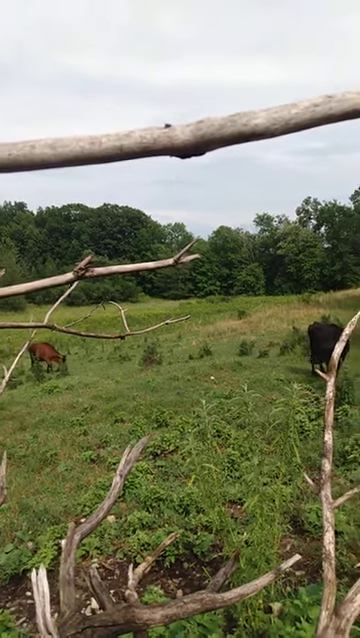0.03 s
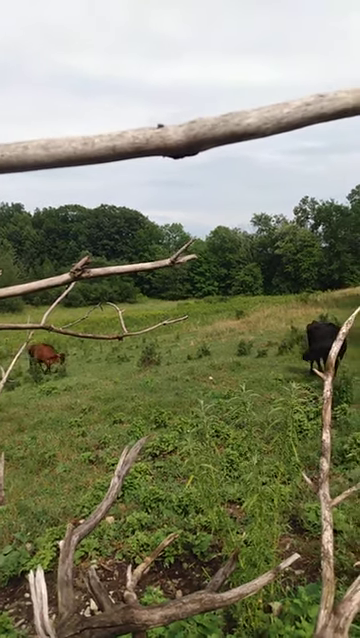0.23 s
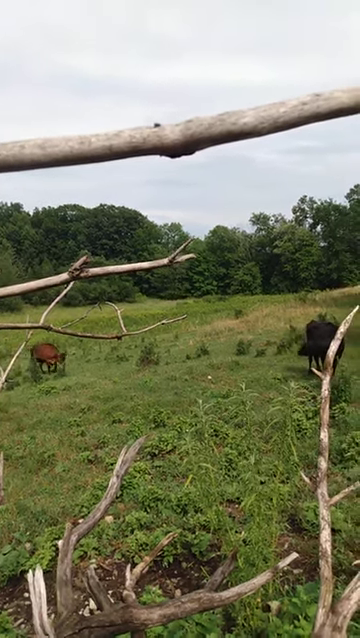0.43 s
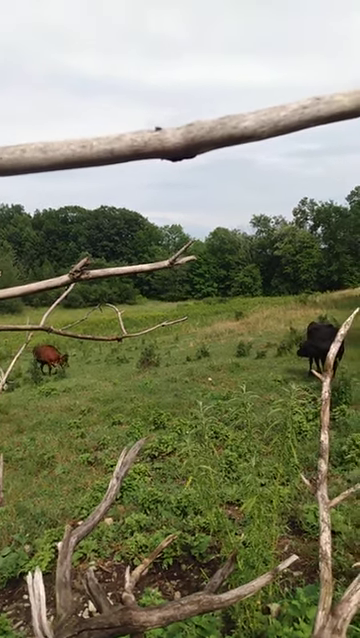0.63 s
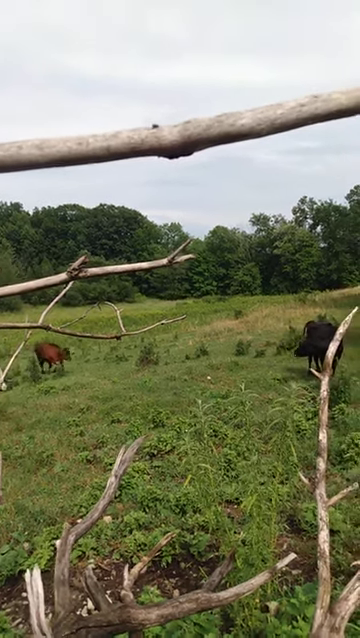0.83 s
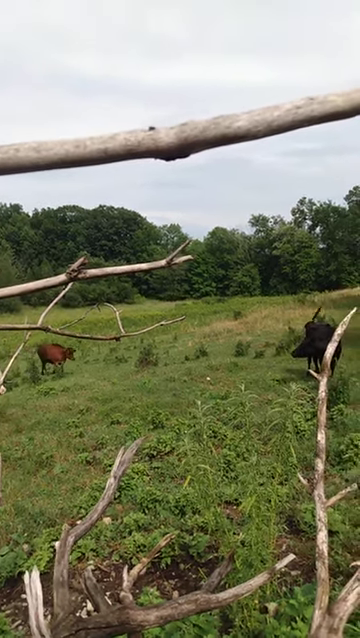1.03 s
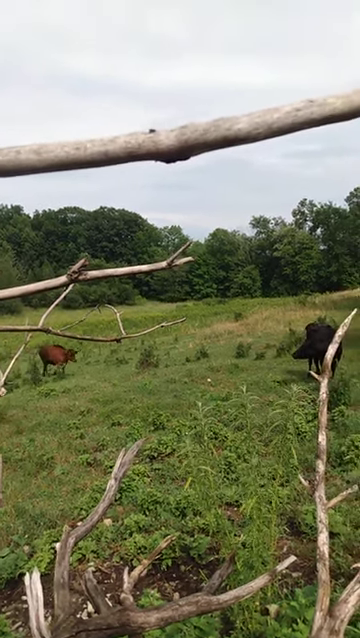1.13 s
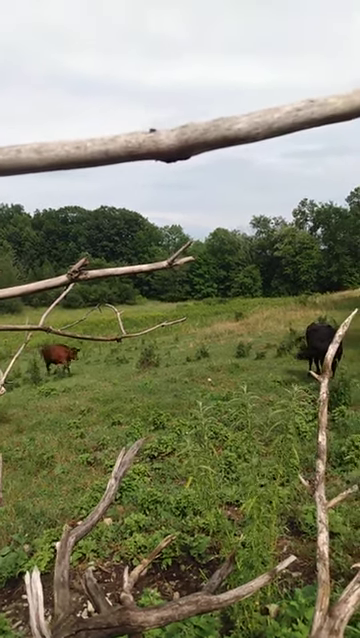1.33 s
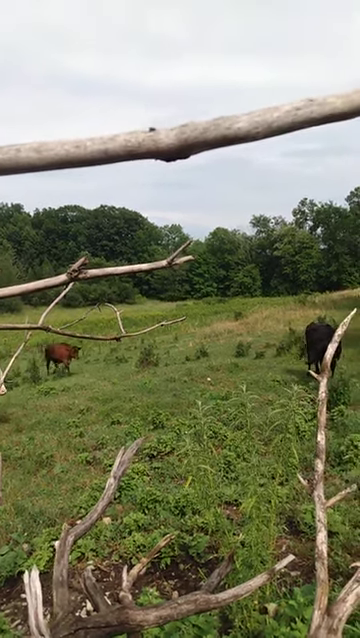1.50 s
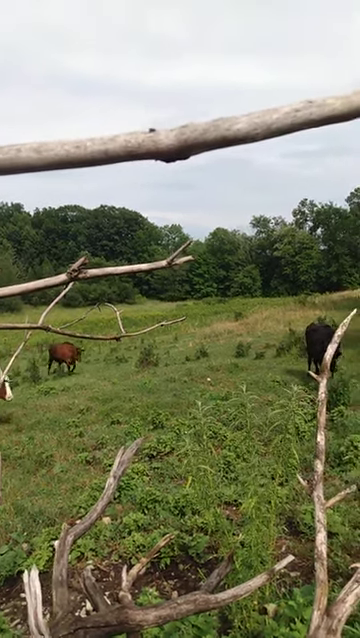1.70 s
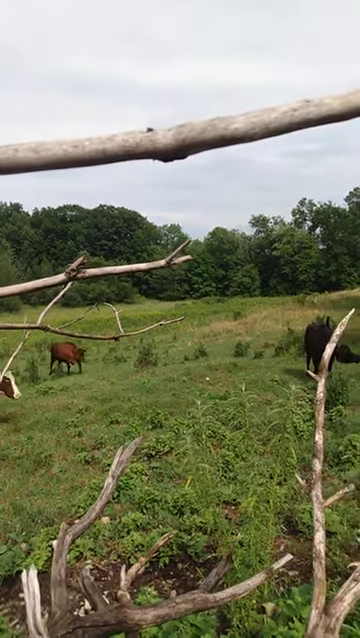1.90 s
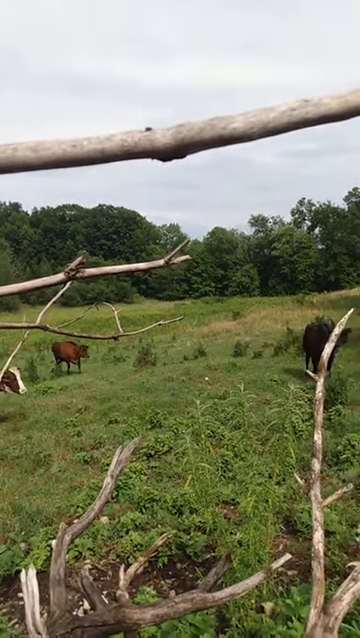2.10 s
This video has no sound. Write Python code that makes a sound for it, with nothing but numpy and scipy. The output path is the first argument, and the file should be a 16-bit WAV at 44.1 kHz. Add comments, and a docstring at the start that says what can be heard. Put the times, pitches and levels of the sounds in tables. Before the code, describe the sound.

Wind buffets the microphone with low rumbling thumps, strongest on the right around 0.2 seconds, fading by 0.5. Weaker puffs return near 1.4 and 2 seconds over a far rumble and soft hiss. Faint birds whistle short, mostly falling notes, mainly in the first 1.3 seconds. High, faint cricket chirps repeat about every 0.4 seconds, with a thin insect chorus and slight grass rustling in the quiet pasture.

```python
"""A quiet summer pasture. A puff of wind buffets the two microphone ports with turbulent pressure,
then sinks to faint eddies over a far rumble and a soft hiss. The grass rustles now and then,
a thin insect chorus merges into one band of noise, and small birds whistle from the echoing
tree line. Two crickets chirp, each at its own pace, by stridulation: quick runs of wing strokes."""
import sys
import numpy as np
from scipy import signal
from scipy.fft import rfft, irfft
from scipy.io import wavfile
from scipy.ndimage import uniform_filter1d

SR = 44100
rng = np.random.default_rng(int(sys.argv[2]) if len(sys.argv) > 2 else 0)


def materialize(psi):
    """Save the field psi as 16-bit PCM at rate SR to the path in sys.argv[1].

    A 1-D psi becomes a single channel; in a 2-D psi each row is a channel.
    """
    bounded = np.clip(np.atleast_2d(psi).T, -1, 1)
    quanta = np.round(bounded * 32767).astype(np.int16)
    wavfile.write(sys.argv[1], SR, quanta)


N = 94815
T = np.arange(N) / SR
FREQS = np.maximum(np.fft.rfftfreq(N, 1 / SR), 1)


def from_db(db):
    """Amplitude grows tenfold every 20 dB."""
    return 10 ** (np.asarray(db) / 20)


def unit_rms(x):
    """Normalisation to unit mean power."""
    return x / np.sqrt(np.mean(x ** 2) + 1e-20)


def envelope(rows):
    """Gain over time, interpolated in decibels."""
    return from_db(np.interp(T, *np.transpose(rows)))


def spectrum(rows):
    """Gain over frequency, interpolated on log-log axes."""
    hz, db = np.transpose(rows)
    return from_db(np.interp(np.log(FREQS), np.log(hz), db))


def noise(shape, correlation=0):
    """Filtered stereo noise of rms 1; the mid-side balance sets the left-right correlation."""
    mid, side = irfft(rfft(rng.standard_normal((2, N))) * shape, N)
    return unit_rms(np.sqrt(1 + correlation) * mid + np.sqrt(1 - correlation) * side * [[1], [-1]])


def wobble(corner_hz):
    """Random modulation: low-passed noise of spread 1."""
    return noise(1 / (1 + (FREQS / corner_hz) ** 2))[0]


def pan(db):
    """Interaural level difference, left minus right; the nearer side keeps full level."""
    return from_db([[min(db, 0)], [min(-db, 0)]])


# Wind at each port. Each row: time in seconds, level in dB.
GUST_LEFT = [(0, -39.5), (.03, -57.5), (.18, -54), (.28, -45), (.36, -55), (.41, -53.5), (.45, -66.5),
             (.66, -69), (.76, -73), (1.0, -65.5), (1.3, -86), (1.44, -63), (1.53, -74), (1.8, -75),
             (1.9, -64.5), (2.15, -71)]
GUST_RIGHT = [(0, -46), (.04, -49.5), (.1, -37.5), (.14, -40.5), (.2, -30), (.26, -32.5), (.305, -52.5),
              (.35, -40), (.41, -44.5), (.445, -55.5), (.495, -51.5), (.55, -66), (.66, -56), (.71, -62),
              (.77, -95), (.95, -72), (1.05, -62), (1.18, -68), (1.34, -69), (1.375, -51), (1.47, -55.5),
              (1.6, -66.5), (1.75, -72.5), (1.98, -64), (2.04, -56), (2.09, -65.5)]
# Large and fine eddies. Each row: frequency in Hz, relative spectral density in dB.
EDDY_SPECTRUM = [(20, 0), (42, 6), (75, -2.5), (110, -5.5), (160, -10), (220, -21.5), (310, -34.5),
                 (450, -43.5), (900, -66), (3000, -88)]
FINE_EDDY_SPECTRUM = [(90, 0), (180, 3), (290, -2.5), (420, -16), (800, -45), (2000, -70)]

def wind(fine_top_db=-47, fine_exponent=1.53):
    """Turbulence, independent at each port; fine eddies grow as a power of the gust and brighten it."""
    eddies = noise(spectrum(EDDY_SPECTRUM))
    local_rms = np.sqrt(uniform_filter1d(eddies ** 2, size=1800, axis=1))
    gust = np.array([envelope(GUST_LEFT), envelope(GUST_RIGHT)])
    fine_gain = from_db(fine_top_db) * (gust / gust.max()) ** fine_exponent
    return gust * eddies / local_rms + fine_gain * noise(spectrum(FINE_EDDY_SPECTRUM))


# Far rumble and soft hiss. Each row: time in seconds, level in dB.
RUMBLE_LEVEL = [(0, -63), (.5, -67), (.75, -70.5), (.92, -67.5), (1.25, -70.5), (1.7, -70), (2.15, -70.5)]
HISS_LEVEL = [(0, -69), (.24, -68), (.41, -68), (.44, -73.5), (.75, -75), (1.1, -74.5), (1.45, -73.5),
              (1.8, -74), (2.15, -74)]
# Their spectra. Each row: frequency in Hz, relative spectral density in dB.
RUMBLE_SPECTRUM = [(20, -12), (55, -1), (100, 2), (125, -1.5), (165, -1), (212, -10), (255, -2),
                   (340, -12.5), (550, -17.5), (1000, -28.5), (2500, -39), (8000, -65)]
HISS_SPECTRUM = [(100, -11), (600, 5.5), (1300, 2), (2500, 0), (4000, -2.5), (5200, -1), (6400, -8),
                 (7800, -6), (9800, -3.5), (11500, 0.5), (13500, -1.5), (15600, -2.5)]
# Lean of the hiss. Each row: frequency in Hz, left minus right in dB.
HISS_BALANCE = [(700, 3), (1300, -2.5), (2400, -2.5), (4400, -1.5), (7500, 0), (15000, 1.5)]

def air():
    """Interaural correlation sets width: high for the centred rumble, low for the wide hiss."""
    lean = np.sqrt(spectrum(HISS_BALANCE))
    hiss = noise(spectrum(HISS_SPECTRUM), correlation=.12)
    hiss = irfft(rfft(hiss) * [lean, 1 / lean], N)
    rumble = noise(spectrum(RUMBLE_SPECTRUM), correlation=.93)
    return envelope(RUMBLE_LEVEL) * rumble + envelope(HISS_LEVEL) * hiss


# Rustling grass. Each row: time in seconds, level in dB.
RUSTLE_LEVEL = [(0, -84), (.25, -73), (.41, -86), (.47, -81), (.8, -93), (1.02, -81), (1.06, -78.5),
                (1.12, -80.5), (1.17, -83.5), (1.6, -88.5), (1.92, -87), (2.02, -74.5), (2.15, -77)]
# Its spectrum. Each row: frequency in Hz, relative spectral density in dB.
RUSTLE_SPECTRUM = [(200, -23), (600, 0), (1300, -1), (2500, -1.5), (4500, -9), (7000, -11), (15000, -18.5)]
# Soft ticks in the grass. Each row: start in seconds, level in dB, band centre in Hz.
GRASS_TICKS = [(1.607, -75, 1000), (1.686, -71.5, 1850)]

def grass(grain_db=3, tick_decay_s=.0091, tick_width_octaves=.3):
    """Random amplitude modulation makes the rustle grainy; ticks are damped bursts of band noise."""
    rustle = noise(spectrum(RUSTLE_SPECTRUM), correlation=.3)
    grain = from_db(grain_db * wobble(corner_hz=89.5))
    out = envelope(RUSTLE_LEVEL) * unit_rms(rustle * grain)
    for start, db, hz in GRASS_TICKS:
        age = np.maximum(T - start, 0) / tick_decay_s
        band = np.exp(-.5 * (np.log2(FREQS / hz) / tick_width_octaves) ** 2)
        out += from_db(db) * np.sqrt(age) * np.exp(-age) * noise(band, correlation=.3)
    return out


# Insect chorus. Each row: time in seconds, level in dB.
CHORUS_LEVEL = [(0, -76), (.38, -76.5), (.46, -81), (.51, -76), (.58, -82.5), (1.2, -82.5), (2.15, -82.5)]
# Its spectrum. Each row: frequency in Hz, relative spectral density in dB.
CHORUS_SPECTRUM = [(4700, -21), (5150, -14.5), (5420, -4), (5700, -2.5), (5850, -6.5), (6050, -32),
                   (6500, -66)]

def insect_chorus():
    """Incoherent summation: many far insects merge into one narrow band of noise."""
    return envelope(CHORUS_LEVEL) * noise(spectrum(CHORUS_SPECTRUM)) * pan(db=-4.5)


# Slurred notes. Each row: start and length in seconds, first pitch, last pitch and burr depth in Hz,
# peak level in dB, echo relative to the note in dB.
BIRD_NOTES = [(.008, 0.033, 3700, 2950, 240, -66.5, 3), (0.06, 0.049, 4760, 3230, 38, -67, -7),
              (0.191, 0.049, 3484, 3164, 134, -72, 6), (0.238, 0.026, 3590, 2580, 150, -65.5, -12),
              (.472, 0.054, 6260, 6200, 20, -78, -20), (0.551, 0.02, 4180, 4340, 260, -74, 1),
              (0.634, 0.053, 4200, 4960, 380, -72, 0.5), (0.682, 0.035, 3610, 2930, 150, -74, -8),
              (0.766, 0.035, 5050, 4020, 330, -71.5, 2), (0.83, 0.037, 3436, 2770, 150, -67, -1),
              (0.903, 0.051, 3440, 2944, 160, -67, -6), (1.212, .048, 3340, 2830, 170, -65, -1.5),
              (1.693, 0.027, 1800, 1830, 26, -77, 0), (2.089, 0.02, 1420, 1200, 130, -68, -6)]

def birds(burr_rate_hz=95.2, warble_depth_hz=49.8):
    """Frequency modulation: each echoing whistle glides, with a fast burr and a random warble."""
    out = np.zeros((2, N))
    warble = warble_depth_hz * wobble(corner_hz=128)
    for start, length, first_hz, last_hz, burr_depth_hz, db, echo_db in BIRD_NOTES:
        progress = np.clip((T - start) / length, 0, 1)
        burr = burr_depth_hz * np.sin(2 * np.pi * burr_rate_hz * (T - start))
        pitch = first_hz + (last_hz - first_hz) * progress + warble + burr
        note = from_db(db) * np.sin(np.pi * progress) * np.sin(2 * np.pi * np.cumsum(pitch) / SR)
        out += note + from_db(echo_db) * tree_echoes(note)
    return out * pan(db=-12)


def tree_echoes(note, t60_s=.25, delay_s=.0097):
    """Scattering from the tree line returns an exponentially decaying tail, different in each ear."""
    tail = rng.standard_normal((2, N)) * from_db(-60 * T / t60_s) * (T > delay_s)
    tail /= np.sqrt(np.sum(tail ** 2, axis=1, keepdims=True))
    return signal.fftconvolve(note[None], tail, axes=1)[:, :N]


# Single eddies. Each row: centre in seconds, level in dB, pitch in Hz, left minus right in dB.
EDDY_THUMPS = [(0.176, -18, 76, -39), (0.204, -28, 124, -25), (0.28, -33.5, 55, 21), (0.33, -35.5, 72, 18),
               (.352, -39.5, 153, -10), (0.488, -51.5, 65.4, -15), (1.044, -56.5, 60.4, 0),
               (1.422, -49, 62, -12), (1.68, -47, 67, 26), (2.051, -50, 49, -3)]

def eddy_thumps(width_cycles=.66, edge_gain=.25):
    """A bipolar pressure pulse: an eddy pushes and then pulls on a port."""
    def pulse(cycles):
        return -np.sin(2 * np.pi * cycles) * np.exp(-(cycles / width_cycles) ** 2)

    out = np.zeros((2, N))
    for centre, db, hz, pan_db in EDDY_THUMPS:
        cycles = (T - centre) * hz
        out += from_db(db) * pan(pan_db) * (pulse(cycles) + edge_gain * pulse(2 * cycles))
    return out


# Chirps of the near and the far cricket. Each row: centre in seconds, peak level in dB.
NEAR_CHIRPS = [(.186, -64), (.611, -71.5), (1.027, -71.5), (1.431, -69), (1.833, -69.5)]
FAR_CHIRPS = [(.258, -77), (.55, -91), (.835, -82.5), (1.16, -83), (1.432, -77.5), (1.695, -80),
              (2.13, -85)]

def cricket(chirps, hz, sag_hz, half_length_s, strokes_per_s, pan_db, stroke_fall_hz=120):
    """Stridulation: each wing stroke sounds a falling tone; level and pitch arch over the chirp."""
    out = np.zeros(N)
    for centre, db in chirps:
        offset = np.clip((T - centre) / half_length_s, -2, 2)
        stroke_phase = (T - centre) * strokes_per_s % 1
        pitch = hz - sag_hz * np.minimum(offset ** 2, 2) - stroke_fall_hz * (stroke_phase - .5)
        arch = np.exp(-np.abs(offset) ** 3) * (np.abs(offset) < 2)
        strokes = np.sin(np.pi * stroke_phase) ** 2
        out += from_db(db) * arch * strokes * np.sin(2 * np.pi * np.cumsum(pitch) / SR)
    return out * pan(pan_db)


def scene():
    """Superposition: the pressures of all sources add."""
    pasture = wind() + air() + grass() + insect_chorus() + birds() + eddy_thumps()
    near = cricket(NEAR_CHIRPS, hz=8470, sag_hz=190, half_length_s=.027, strokes_per_s=122, pan_db=-12.5)
    far = cricket(FAR_CHIRPS, hz=8960, sag_hz=51.1, half_length_s=.035, strokes_per_s=91, pan_db=-.5)
    return pasture + near + far


def record(dry):
    """Band limiting: the recorder drops the deepest bass and cuts the top steeply."""
    highpass = signal.butter(2, 20, "high", fs=SR, output="sos")
    lowpass = signal.ellip(12, .1, 80, 15700, fs=SR, output="sos")
    return signal.sosfilt(lowpass, signal.sosfilt(highpass, dry))


dry = scene()
out = record(dry)
materialize(out)
```